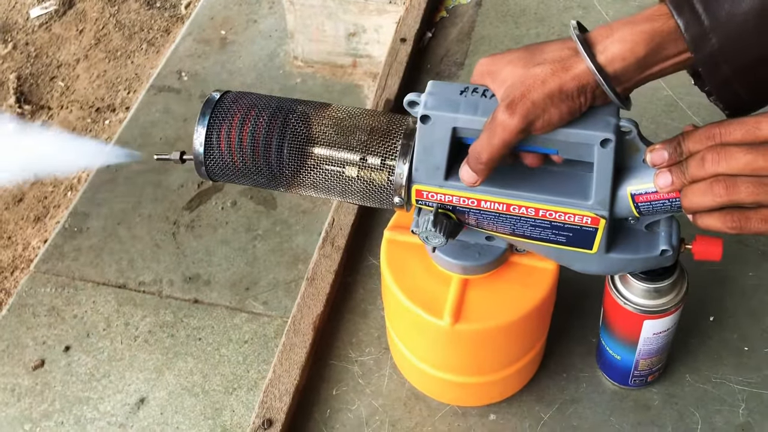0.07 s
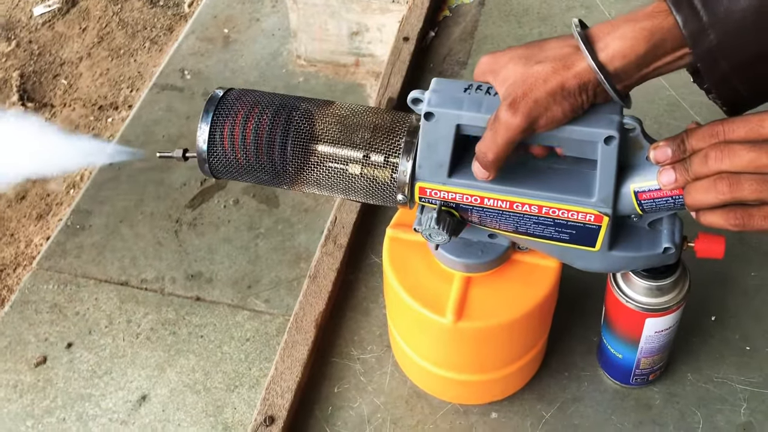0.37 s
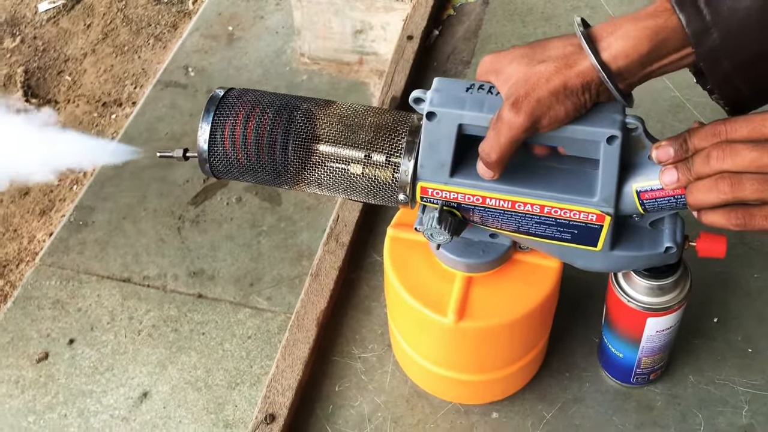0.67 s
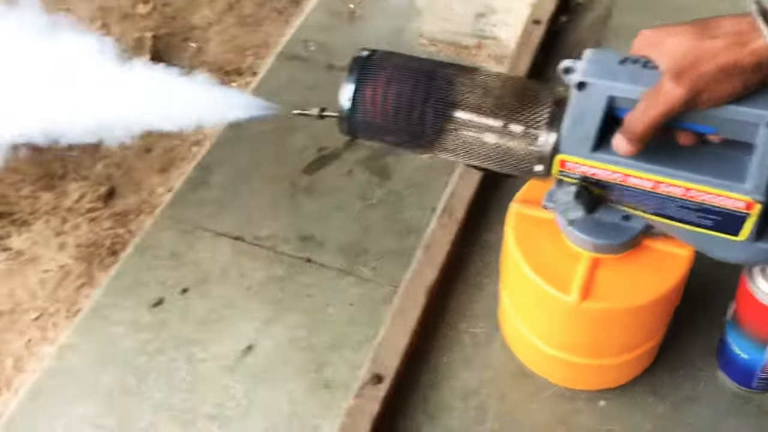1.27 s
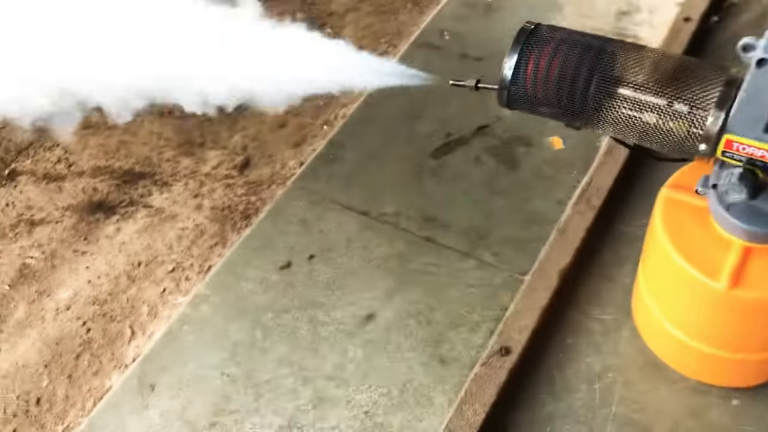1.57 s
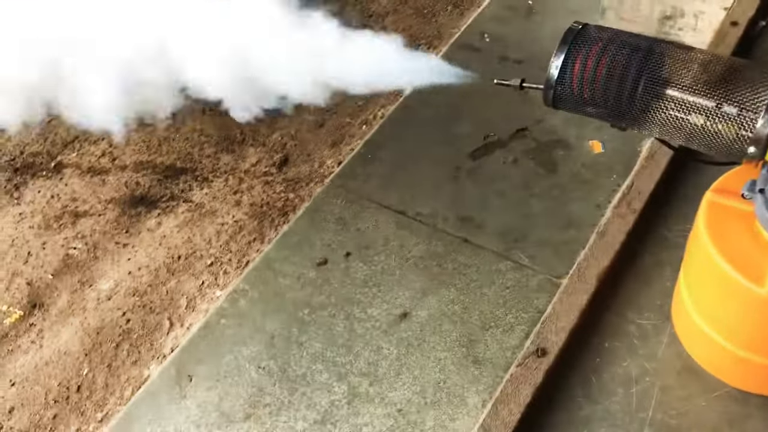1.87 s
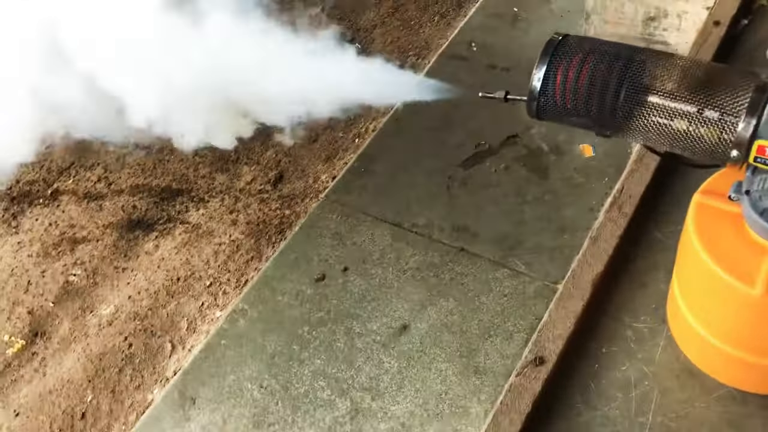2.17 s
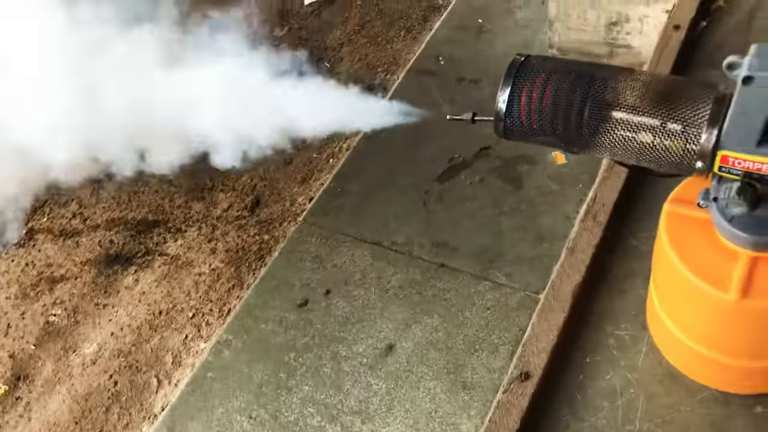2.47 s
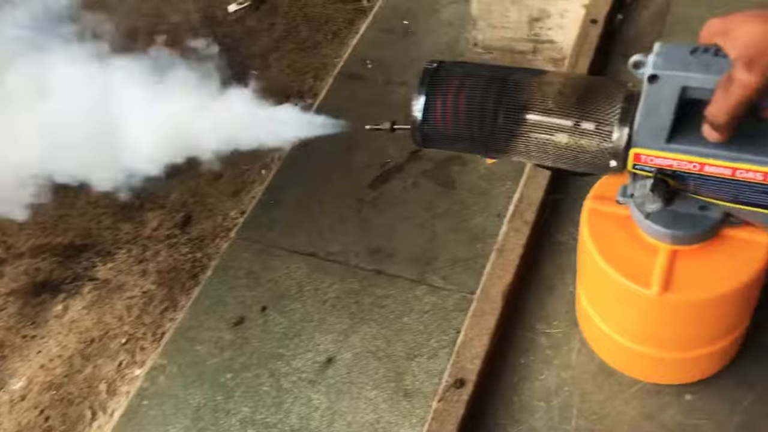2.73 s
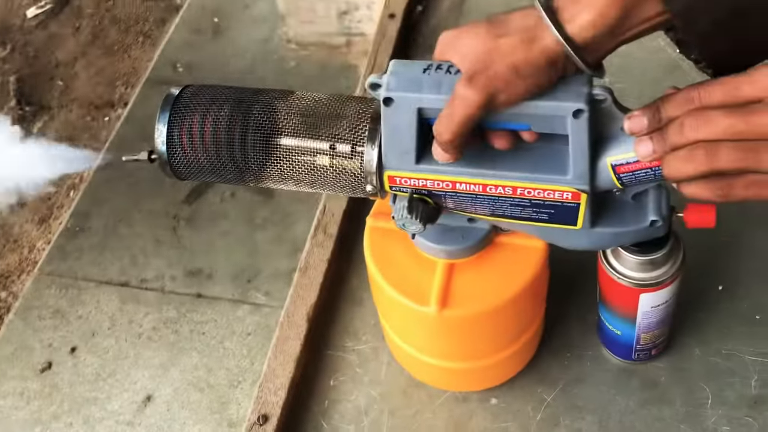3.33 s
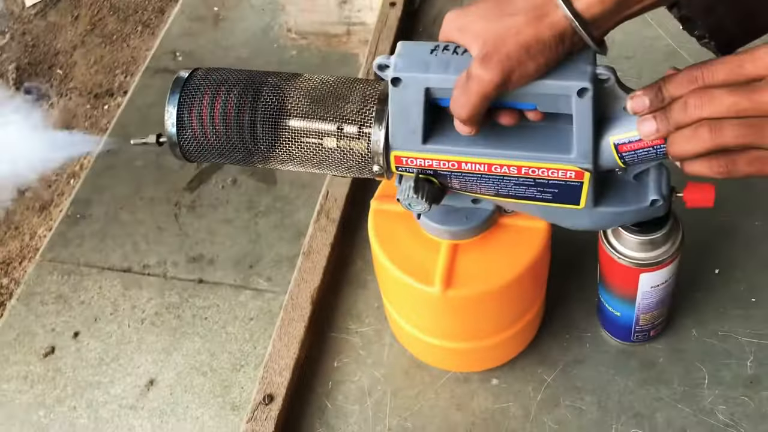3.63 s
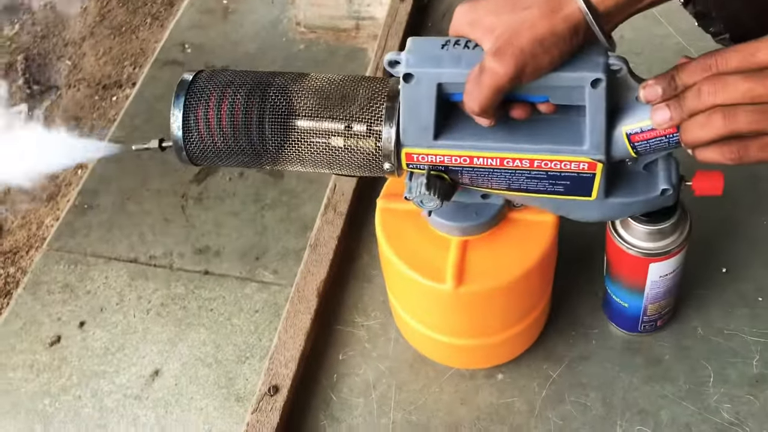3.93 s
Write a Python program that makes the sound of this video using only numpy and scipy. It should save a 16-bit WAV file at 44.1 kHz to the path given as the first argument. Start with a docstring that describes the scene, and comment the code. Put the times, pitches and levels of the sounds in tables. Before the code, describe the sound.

Hissing vapour surges and dips from a handheld fogger, its gas flame rumbling underneath.

```python
"""A handheld gas fogger runs close by, outdoors over stone paving.
From the start, vapour hisses from the nozzle in surges over the steady rumble of the burner flame.
Liquid spits in the hot coil now and then during the first 2.4 s. The hiss peaks near 0.9 s.
The machine swings aside by 1.5 s and back after 2.4 s, shifting the short reflections that
colour the hiss. Near 3.5 s the jet almost dies away, then surges once more."""
import sys
import numpy as np
from scipy import signal
from scipy.fft import rfft, irfft
from scipy.io import wavfile
from scipy.ndimage import map_coordinates

SR = 44100
rng = np.random.default_rng(int(sys.argv[2]) if len(sys.argv) > 2 else 0)


def transcribe(u):
    """Save the signal u as a 16-bit wav file named by the first command-line argument.

    u: samples, shape (n,) or (channels, n), limited to [-1, 1]; the rate is SR.
    q: integer samples, one column per channel.
    """
    v = np.clip(np.atleast_2d(u).T, -1, 1)
    q = np.round(v * 32767).astype(np.int16)
    wavfile.write(sys.argv[1], SR, q)


N = 176400
TIME_S = np.arange(N) / SR
FREQ_HZ = np.maximum(np.arange(N // 2 + 1) * SR / N, 1)


def undb(db):
    """Decibels to gain."""
    return 10 ** (np.asarray(db) / 20)


def curve(rows, column=1):
    """One table column, interpolated linearly in time."""
    rows = np.array(rows)
    return np.interp(TIME_S, rows[:, 0], rows[:, column])


def unit_rms(x):
    """Scale to rms 1."""
    return x / np.std(x)


def filtered(x, gain):
    """Apply one gain per frequency."""
    return irfft(rfft(x) * gain, N)


def noise(spectrum):
    """Noise shaped by (freq_hz, density_db) points, rms 1."""
    freq_hz, density_db = np.array(spectrum).T
    gain = undb(np.interp(np.log(FREQ_HZ), np.log(freq_hz), density_db))
    return unit_rms(filtered(rng.standard_normal(N), gain))


def wander(rate_hz):
    """Smooth random motion up to about rate_hz, rms 1."""
    return unit_rms(filtered(rng.standard_normal(N), np.exp(-(FREQ_HZ / rate_hz) ** 2)))


def treble_shelf(x, corner_hz, gain_db):
    """High shelf with time-varying gain."""
    treble = filtered(x, FREQ_HZ ** 4 / (FREQ_HZ ** 4 + corner_hz ** 4))
    return x + (undb(gain_db) - 1) * treble


# Jet strength: time_s, level_db
JET_SURGES = [(0, -24.5), (.075, -30.5), (.12, -28.5), (.165, -22), (.23, -17.5), (.35, -19), (.4, -21.5),
              (.44, -23.5), (.52, -29), (.67, -24), (.76, -18.5), (.84, -16), (.93, -15.5), (1.02, -19),
              (1.11, -19), (1.2, -23), (1.28, -27.5), (1.42, -21), (1.5, -21), (1.8, -22), (1.92, -25),
              (2, -31), (2.07, -25), (2.16, -20), (2.26, -22.5), (2.46, -23.5), (2.53, -29.5),
              (2.63, -27.5), (2.74, -23.5), (2.91, -23), (3, -26.5), (3.21, -23.5), (3.31, -26),
              (3.42, -33), (3.55, -40), (3.6, -35), (3.69, -27), (3.8, -25), (3.88, -27.5), (4, -32)]
# Jet spectrum: freq_hz, density_db
JET_SPECTRUM = [(150, -25), (450, -10.5), (800, -10.5), (1400, -6.5), (2300, -9), (4000, -3), (6000, -1.5),
                (8500, -0.5), (12000, -0.8), (14500, -3), (16000, -9)]
# Jet treble against bass: time_s, tilt_db
JET_TILT = [(0, 2), (.25, 3.5), (.42, 1), (1.15, 0), (1.4, -1.2), (2.1, -1.7), (2.3, 1), (2.55, -3),
            (2.8, 0), (3.2, 0.2), (3.5, -1), (4, -0.5)]
# Machine swing: time_s, position (0 rest, 1 fully aside, negative the other way)
SWING_PATH = [(0, -0.45), (1.15, 0.12), (1.5, 0.92), (1.9, 0.94), (2.4, 0.86), (2.75, -.05), (3.2, -0.54),
              (4, 0.018)]


def vapour_jet():
    """Turbulent wet vapour sizzles, flutters and brightens with each surge."""
    surge_db, swing = curve(JET_SURGES), curve(SWING_PATH)
    hiss = noise(JET_SPECTRUM)
    sizzle_db = 0.43 * wander(rate_hz=910)
    hiss = nozzle_resonance(hiss * undb(sizzle_db), swing)
    hiss = unit_rms(reflections(hiss, swing))
    bright_db, tilt_db = 0.039 * (surge_db - surge_db.mean()), curve(JET_TILT)
    hiss = treble_shelf(hiss, corner_hz=3040, gain_db=bright_db) * undb(-bright_db)
    hiss = treble_shelf(hiss, corner_hz=7500, gain_db=tilt_db) * undb(-tilt_db / 2)
    trim_db, flutter_db = 0.5, 0.42 * wander(rate_hz=45)
    return hiss * undb(surge_db + trim_db + flutter_db)


# Nozzle and cage peaks and notches: centre_hz, width_hz, rest_db, swung_db
NOZZLE_BANDS = [(1370, 120, -6.5, -6.5), (1704, 340, 4, 4), (2620, 270, 5, 6), (3680, 200, 3.5, -2),
                (3980, 160, -3, 2.5), (5560, 87, 0.5, 2.5), (5984, 150, 0, 3), (7800, 120, 0, 0),
                (8000, 300, 1.5, 1.5), (9040, 310, 0.5, 1.5), (10400, 230, -0.5, 1)]


def nozzle_resonance(hiss, swing):
    """The resonant colour of the nozzle and its cage changes with angle."""
    rest_eq_db = swung_eq_db = 0
    for centre_hz, width_hz, rest_db, swung_db in NOZZLE_BANDS:
        bell = 1 / (1 + (2 * (FREQ_HZ - centre_hz) / width_hz) ** 2)
        rest_eq_db += rest_db * bell
        swung_eq_db += swung_db * bell
    return (1 - swing) * filtered(hiss, undb(rest_eq_db)) + swing * filtered(hiss, undb(swung_eq_db))


# Echoes off paving and housing: rest_delay_ms, swung_delay_ms, rest_db, swung_db, centre_hz
ECHO_PATHS = [(.876, 0.862, -25.5, -15, 11000), (1.088, 1.07, -21, -23, 3700),
              (1.882, 1.833, -17.5, -19, 2600), (1.94, 1.62, -38, -17.5, 5000), (3.08, 3.9, -40, -22, 5000),
              (3.21, 5.2, -15, -40, 4000)]


def reflections(hiss, swing):
    """Near surfaces comb the hiss, notches sliding with the swing; the surroundings add scatter."""
    width_octaves, scatter_db, scatter_decay_s = 3.7, -15, 0.01
    combed = hiss
    for rest_delay_ms, swung_delay_ms, rest_db, swung_db, centre_hz in ECHO_PATHS:
        delay_s = (rest_delay_ms + (swung_delay_ms - rest_delay_ms) * swing) / 1000
        band = filtered(hiss, np.exp(-0.5 * (np.log2(FREQ_HZ / centre_hz) / width_octaves) ** 2))
        echo = map_coordinates(band, [(TIME_S - delay_s) * SR], order=3, mode="mirror")
        gain = np.interp(swing, [0, 1], undb([rest_db, swung_db]))
        combed = combed + gain * echo
    tail = rng.standard_normal(N) * np.exp(-TIME_S / scatter_decay_s) * (TIME_S > 0.002)
    scatter = filtered(combed, rfft(tail / np.linalg.norm(tail)))
    return combed + undb(scatter_db) * scatter


# Flame spectrum: freq_hz, density_db
FLAME_SPECTRUM = [(20, -32), (36, -26), (54, -1), (68, -4), (90, -0.5), (120, 0.5), (200, -5.5),
                  (280, -14.5), (500, -16.5), (900, -22), (2500, -24.5), (9000, -30.5), (16000, -40)]
# Flame strength: time_s, level_db
FLAME_ENVELOPE = [(0, -36.5), (.6, -37), (1.1, -39), (1.7, -36.5), (1.95, -34.5), (2.2, -34), (2.4, -37.5),
                  (2.8, -36), (3.05, -34), (3.4, -36.5), (3.75, -34), (4, -35)]
# Low drone in the rumble: time_s, pitch_hz, rms_db
BURNER_DRONE = [(0, 76.2, -61), (.7, 78.3, -46.5), (1.2, 77.75, -38.5), (1.55, 79.4, -46.5), (1.9, 81, -40),
                (2.4, 82.7, -42), (2.7, 84, -55), (4, 86.7, -55)]


def burner():
    """The flickering flame rumbles, with a faint rush of gas and a wavering drone."""
    rumble = noise(FLAME_SPECTRUM)
    trim_db, flicker_db = 0.7, 0.55 * wander(rate_hz=30)
    rumble *= undb(curve(FLAME_ENVELOPE) + trim_db + flicker_db)
    pitch_hz = curve(BURNER_DRONE) * (1 + 0.008 * wander(rate_hz=6))
    drone = np.sqrt(2) * np.sin(2 * np.pi * np.cumsum(pitch_hz) / SR)
    return rumble + drone * undb(curve(BURNER_DRONE, column=2))


# Spits in the coil: start_s, start_pitch_hz, level_db
COIL_SPITS = [(.030, 1300, -25.5), (.038, 1010, -29), (.389, 1200, -28), (.410, 1400, -28),
              (.422, 700, -27.5), (.773, 850, -28), (1.117, 1110, -38), (1.137, 1250, -24),
              (1.565, 1300, -28), (2.332, 950, -27.5)]
# Puff of each spit: freq_hz, density_db
PUFF_SPECTRUM = [(150, -12), (450, 1), (1000, -2), (2000, -12), (8000, -24)]


def coil_spits():
    """Each slug of liquid flashing to vapour gives a dry puff and a short, falling blip."""
    rise_s, pitch_decay_s = 0.0017, 0.0073
    puff_db, puff_decay_s = -10.5, 0.0077
    spits, puff_noise = np.zeros(N), noise(PUFF_SPECTRUM)
    for start_s, start_pitch_hz, level_db in COIL_SPITS:
        age_s = np.clip(TIME_S - start_s, 0, 0.1)
        cycles = start_pitch_hz * pitch_decay_s * (1 - np.exp(-age_s / pitch_decay_s))
        envelope = age_s / rise_s * np.exp(1 - age_s / rise_s)
        blip = envelope * np.sin(2 * np.pi * (cycles + rng.random()))
        puff = puff_noise * (age_s > 0) * np.exp(-age_s / puff_decay_s)
        spits += undb(level_db) * (blip + undb(puff_db) * puff)
    return spits


def scene():
    """Jet, burner and spits, the same in both ears."""
    return np.tile(vapour_jet() + burner() + coil_spits(), (2, 1))


def record(dry):
    """Steep elliptic low-pass on the top treble."""
    cutoff_hz = 15750
    return signal.sosfilt(signal.ellip(12, 0.1, 90, cutoff_hz, fs=SR, output="sos"), dry)


dry = scene()
out = record(dry)
transcribe(out)
```